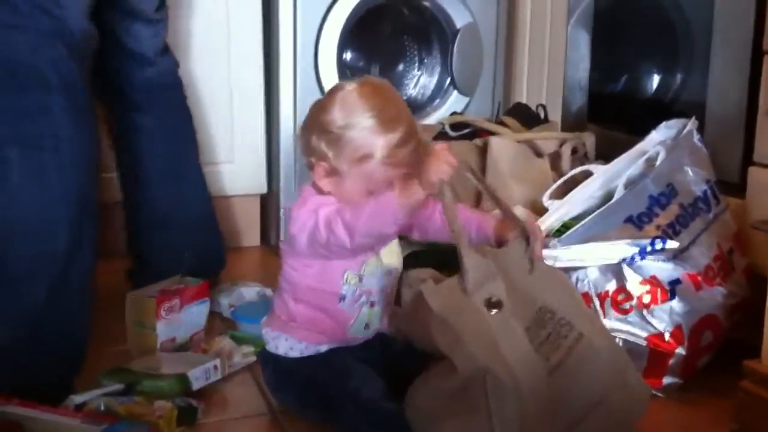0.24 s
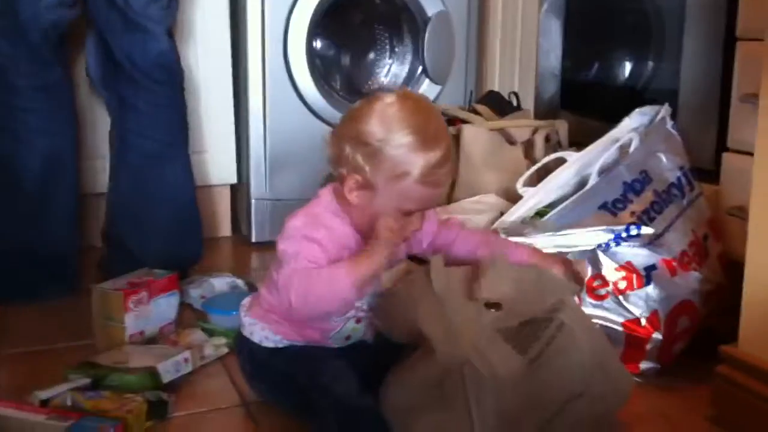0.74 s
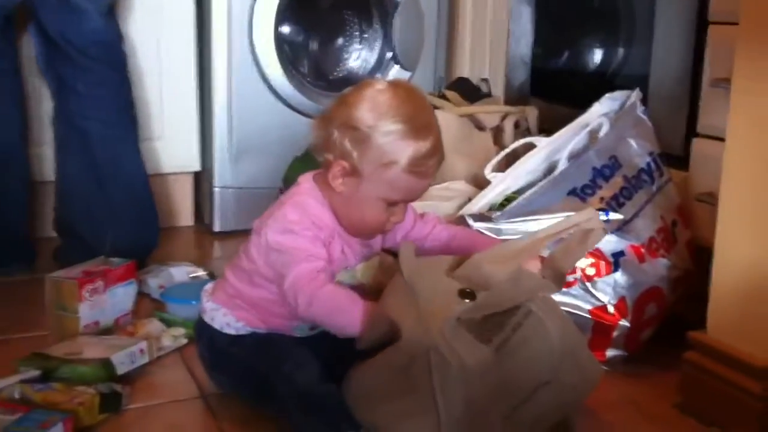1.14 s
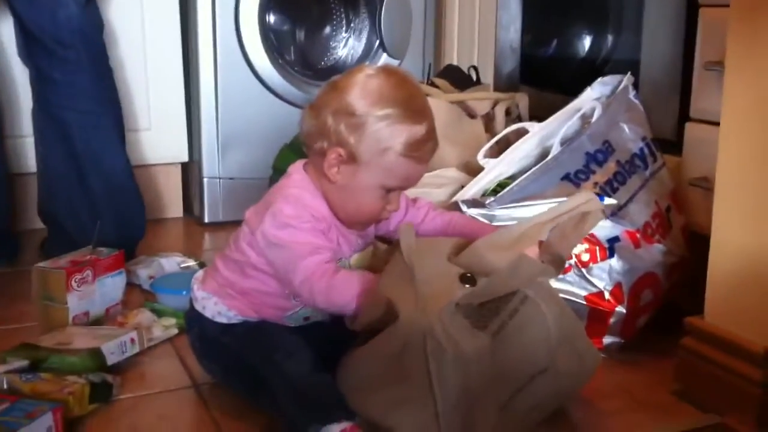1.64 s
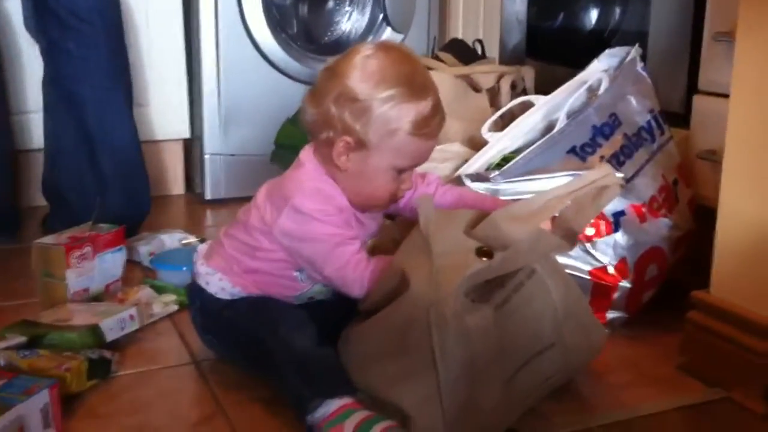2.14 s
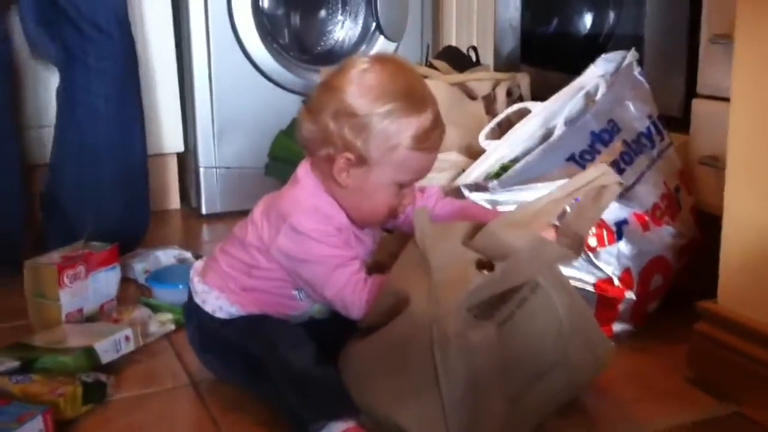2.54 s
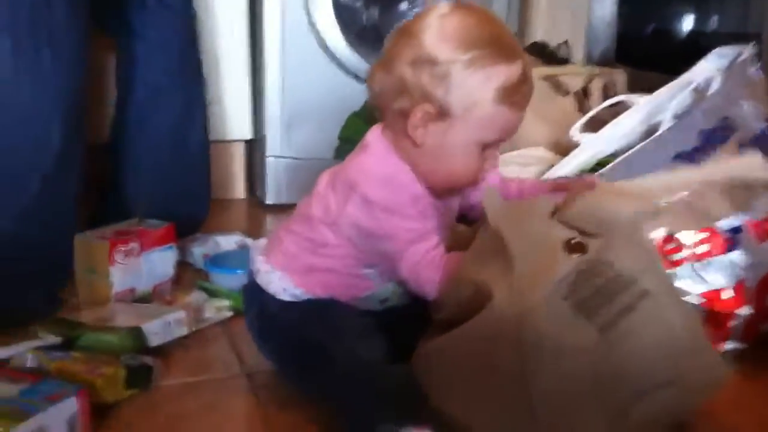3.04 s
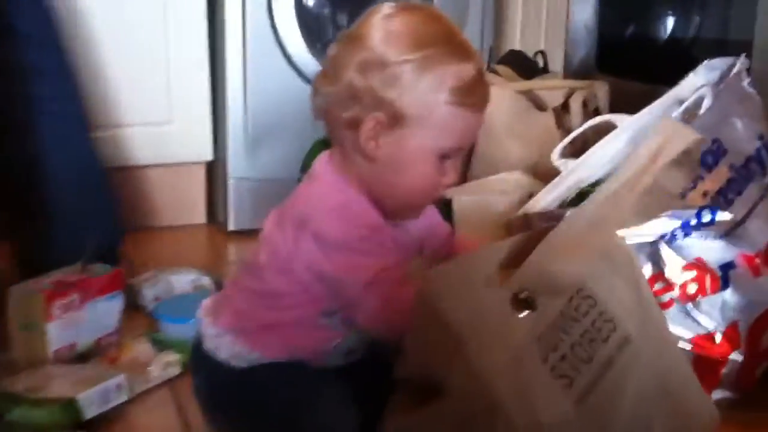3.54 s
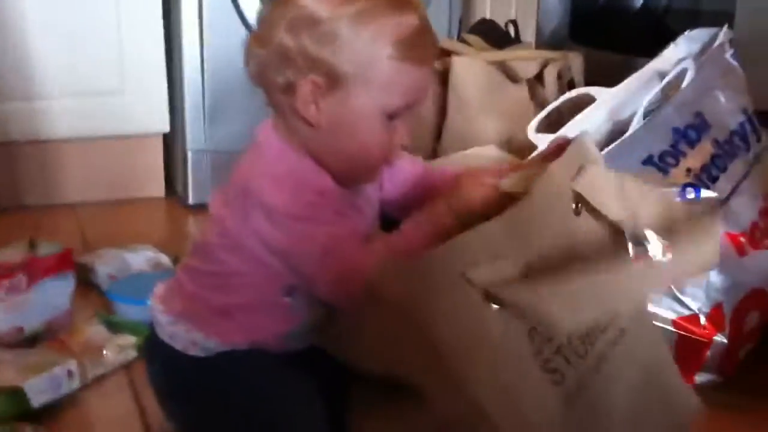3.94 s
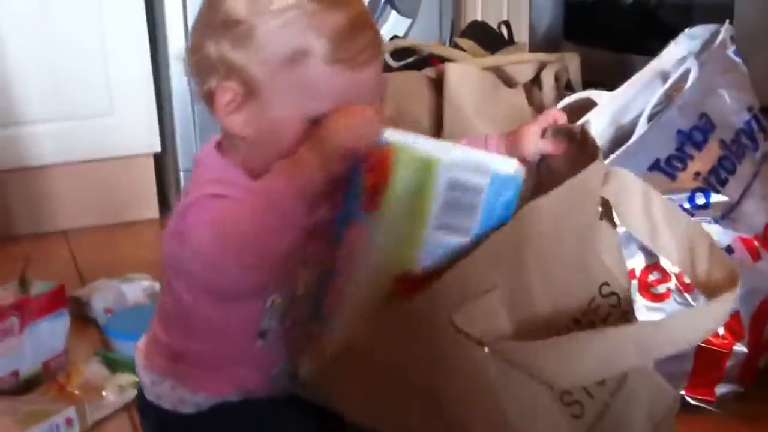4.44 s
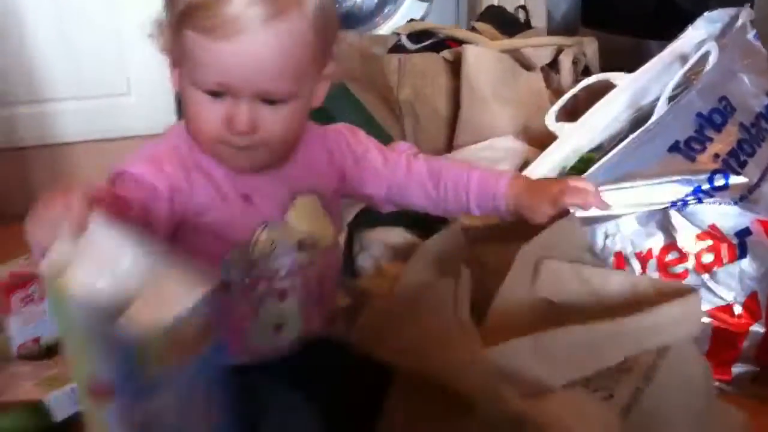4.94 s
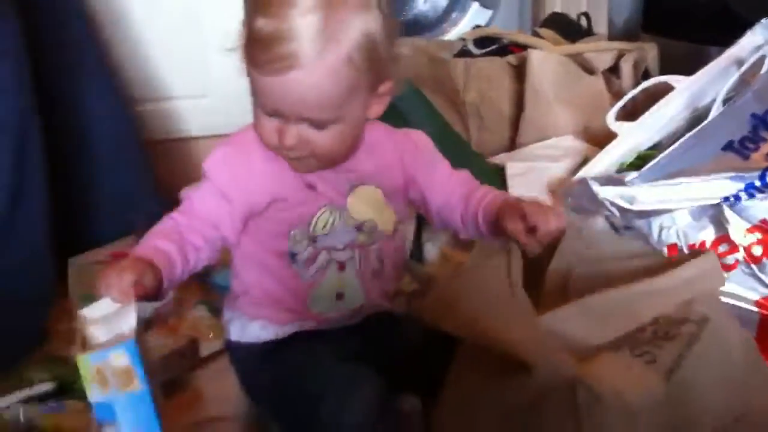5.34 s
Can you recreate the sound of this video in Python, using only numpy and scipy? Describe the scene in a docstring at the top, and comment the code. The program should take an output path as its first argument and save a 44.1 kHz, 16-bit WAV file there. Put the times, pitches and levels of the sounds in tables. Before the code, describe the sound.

Over a steady low hiss in a small tiled kitchen, heard at one microphone, a paper bag gives only faint crinkles and tiny dry ticks during the first second. At about 1.4 s something heavy, perhaps a drawer, clunks and rumbles; a second, harder clunk at 1.7 s rattles, rings and quickly settles. Soft, low bumps and light drumming of the bag follow around 2.1 s. From 3.0 s cardboard stutters along the paper in two quickening runs of small rasps, with scraping between and after them until about 3.8 s, then a crisp crease at 3.9 s. Rustling brightens around 4.3 s as the carton is pulled out; the bag's side buckles with a hollow double boom at 4.7 s, and dull bumps follow at 4.9 s. At 5.2 s the carton knocks loudly on the tiles, dry contents shifting, and paper rustles again near 5.5 s.

```python
"""A paper shopping bag on a tiled kitchen floor, rummaged in by a small child, heard at one microphone.
The paper slides and crinkles: noise and clumped snaps shaped by the strokes of the hands, with short dry ticks.
A cardboard carton stutters along the inside, is dragged out over the booming side and knocked down on the tiles:
noise bursts, plus ringing modes for the knock. Early on something heavy, perhaps a drawer, clunks twice and
rumbles. The kitchen answers briefly with decaying noise, over a steady hiss."""
import sys
import numpy as np
from scipy import signal
from scipy.fft import rfft, irfft, next_fast_len
from scipy.io import wavfile
from scipy.ndimage import uniform_filter1d, map_coordinates

SR = 44100
rng = np.random.default_rng(int(sys.argv[2]) if len(sys.argv) > 2 else 0)


def transcribe(signal):
    """Save signal, clipped to [-1, 1], as a 16-bit WAV file at the path in sys.argv[1]."""
    frames = np.atleast_2d(signal).T
    limited = np.clip(frames, -1, 1)
    pcm = np.round(limited * 32767).astype(np.int16)
    wavfile.write(sys.argv[1], SR, pcm)


N = 246386  # length in samples

# "Before trim" marks a level that its function shifts by a fixed number of dB.
# The side of the bag buckles. Each row: start [s], level before trim [dB],
# crackle against boom before trim [dB], decay time T60 of the boom [s].
BUCKLES = [(4.724, -28.5, -19, 0.15), (4.764, -30, -32, 0.085)]
# Soft bumps inside the bag. Each row: start [s], level before trim [dB], pitch [Hz].
BUMPS = [(0.395, -61, 264), (0.493, -59, 300), (1.42, -38, 353), (1.54, -41, 317), (2.102, -40, 386),
         (2.134, -46, 397), (2.17, -52, 384), (4.184, -48.5, 250), (4.257, -53, 259), (4.858, -39.5, 338),
         (4.912, -41, 420)]
# The carton sticks and slips on the paper. Each row: start [s], number of slips, first wait [s],
# level before trim [dB], pitch of the rasp [Hz], boom against the first rasp [dB].
SLIP_RUNS = [(2.999, 6, 0.047, -43.5, 800, -9), (3.255, 9, 0.035, -45, 1160, -1),
             (4.182, 1, 0, -42.5, 1040, -1), (4.315, 1, 0, -44, 1770, -27), (4.377, 1, 0, -47.5, 1260, -12)]
# Short dry ticks: the loudest creases, and at 5.186 s a bright tick just before the landing.
# Each row: start [s], level [dB], pitch [Hz].
LOUD_TICKS = [(0.091, -63.5, 7300), (0.2996, -60.5, 6000), (0.3391, -64, 2620), (1.246, -60, 8600),
              (1.6016, -57.5, 5540), (2.8061, -56.5, 2700), (2.9296, -61, 3300), (3.8828, -47, 2800),
              (3.985, -56, 6700), (4.0724, -63, 3540), (4.13, -59.5, 2560), (4.2203, -56, 5300),
              (4.3, -55, 11000), (4.4497, -61, 5400), (4.531, -53.5, 9800), (4.7261, -51, 3300),
              (5.186, -43, 7040), (5.2474, -48.5, 3600), (5.375, -59.5, 5370), (5.4596, -59, 3530),
              (5.501, -52.5, 4270)]
# The carton lands. Each row: start [s], level before trim [dB], dull above [Hz].
LANDING_CONTACTS = [(5.194, -22.5, 14000), (5.2012, -29.5, 4050), (5.216, -33, 900)]
# Heavy clunks. Each row: start [s], level [dB], ring against the clunk before trim [dB],
# rattle against the push [dB], centre of the push resonance [Hz], its sharpness Q [-],
# rise of the push [s], decay time T60 of the push [s].
CLUNKS = [(1.367, -26, -4, -20, 332, 0.38, 0.011, 0.039),
          (1.677, -22.5, -9.5, -25, 422, 0.66, 0.0022, 0.0426),
          (1.692, -28.5, -7, -24.5, 827, 3.5, 0.0049, 0.11),
          (1.726, -30, -11, -19.5, 403, 0.9, 0.0054, 0.03)]
# The heavy thing rumbles on after each clunk. Each row: start [s], end [s], level [dB], fade [dB per s].
ROLLS = [(1.367, 1.682, -38.5, 26.5), (1.675, 2.1, -34, 99)]
# Strokes of friction, mostly sliding paper. Each row: peak [s], rise [s], fall [s], then, before trim,
# hollow drumming [dB], scraping [dB], crinkling [dB], and last brightness [dB per octave].
STROKES = [(0.095, 0.05, .08, -83, -71.5, -63.5, 3), (0.32, 0.081, 0.051, -81, -66.5, -64, 0.5),
           (0.66, 0.37, 0.17, -77, -84, -66.5, 0.5), (0.84, 0.18, 0.091, -86, -62.5, -57.5, 0.5),
           (1.391, 0.019, 0.077, -74, -67, -52.5, -1.5), (1.70, 0.072, 0.048, -67, -47.5, -49, 0.5),
           (1.96, 0.14, 0.12, -62, -60, -63, -0.5), (2.12, 0.069, .05, -58, -61, -69, -2),
           (2.41, 0.079, 0.075, -64.5, -61, -62, -3), (2.76, 0.53, 0.095, -93, -73.5, -64, 1),
           (2.86, 0.052, 0.1, -58, -58, -68.5, -6), (3.004, 0.04, 0.065, -56, -53, -58.5, -3.5),
           (3.1, 0.069, 0.079, -53, -45, -54.5, -1), (3.415, 0.047, 0.083, -76, -54, -57, -3.5),
           (3.4, 0.58, 0.37, -68.5, -61, -58.5, -1), (3.64, 0.088, 0.12, -57, -54.5, -56.5, 0.5),
           (3.745, 0.1, .15, -65, -52.5, -49.5, -0.5), (3.96, 0.13, 0.1, -64.5, -63, -57.5, 2.5),
           (4.259, .12, 0.098, -61.5, -55, -49, 2), (4.47, .025, .08, -63, -58.5, -61, 0),
           (4.545, 0.048, 0.091, -53.5, -61, -60.5, 2), (4.67, 0.076, .1, -57, -62, -65, 0),
           (4.77, .05, 0.087, -44.5, -55, -57.5, -4), (4.929, 0.13, 0.083, -48.5, -57, -54.5, 2.5),
           (5.02, 0.058, 0.1, -54, -65.5, -60, 4), (5.22, 0.023, 0.055, -67, -64, -45.5, -3),
           (5.29, 0.042, 0.088, -55.5, -59, -67, -2), (5.519, 0.067, 0.094, -58.5, -49.5, -50, -3.5)]

# Modes of the carton. Each row: frequency [Hz], relative level [dB], decay time T60 [s].
CARTON_MODES = [(155.4, -8, 0.13), (311, 1.5, 0.1), (351, 4.5, 0.075), (605, -18, 0.05), (810, -1, 0.094),
                (1560, -3, 0.081), (2143, -7, 0.11), (2896, -10.5, 0.21)]
# Modes of the heavy clunking thing. Each row: frequency [Hz], relative level [dB], decay time T60 [s].
HEAVY_MODES = [(141, -14.5, 0.24), (302, 1, 0.18), (386, 3, 0.32), (451, -1, 0.36), (524, -3, 0.18),
               (609, -2, 0.46), (694, 0, 0.18), (748, 7.5, 0.13), (895, -22, .2), (1120, -3.5, .17),
               (1694, -4, 0.38), (1747, -14, 0.33), (2655, -16.5, 0.33), (3010, -21, 0.51),
               (3327, -18, 0.38), (4280, -31, 0.27), (4650, -13.5, .42), (4750, -23.5, 0.35)]

# Boom of the bag's side. Each row: frequency [Hz], relative level [dB per Hz].
PANEL_SPECTRUM = [(30, -40), (75, -33), (105, -7), (160, -6), (350, 0.5), (550, -5.5), (800, -9),
                  (1150, -14), (1700, -16.5), (2500, -23.5), (8000, -35)]
# Carton against tiles. Each row: frequency [Hz], relative level [dB per Hz].
KNOCK_SPECTRUM = [(30, -25), (75, -20.5), (150, 3.5), (235, -10.5), (330, 3.5), (470, -4.5), (720, 4),
                  (1100, -9.5), (2200, -12), (4500, -16), (6000, -14), (9500, -21.5), (15800, -25)]
# Hollow drumming of the bag's sides. Each row: frequency [Hz], relative level [dB per Hz].
DRUM_SPECTRUM = [(25, -37), (70, -19), (115, 0), (190, 0.5), (330, 2), (450, 0.5), (620, -3), (1100, -7.5),
                 (3000, -70.5)]
# Scraping on the paper's surface. Each row: frequency [Hz], relative level [dB per Hz].
SCRAPE_SPECTRUM = [(200, -44), (520, -1.5), (800, 1.5), (1150, 2.5), (1600, -1.5), (2700, -10.5),
                   (4000, -17), (9000, -45)]
# Crinkling of the folds. Each row: frequency [Hz], relative level [dB per Hz].
CRINKLE_SPECTRUM = [(1000, -48), (2000, -3), (2800, 2.5), (4500, 0), (7000, -1), (10000, -4), (13000, -5.5),
                    (15800, -9.5)]
# Crackle of a buckling side, also the rattle of a clunk. Each row: frequency [Hz], relative level [dB per Hz].
CRACKLE_SPECTRUM = [(800, 5), (2800, -2), (6500, -1.5), (10000, -9), (15800, -31)]
# Room and microphone background. Each row: frequency [Hz], relative level [dB per Hz].
HISS_SPECTRUM = [(25, 0), (70, -10), (140, 4), (300, 2.5), (900, -0.5), (2000, -3.5), (5000, -5),
                 (10000, -7.5), (15800, -6.5)]
# Push of the heavy thing. Each row: frequency [Hz], relative level [dB per Hz].
THUD_SPECTRUM = [(30, -53), (80, -29), (130, 9.5), (205, -8), (330, 6), (480, -2.5), (780, -3.5),
                 (1150, -6), (1350, -12.5), (1750, -10), (2300, -17.5), (4000, -29), (15000, -43)]
# Dry contents of the carton. Each row: frequency [Hz], relative level [dB per Hz].
CONTENTS_SPECTRUM = [(400, -12), (1000, -5), (2300, 0), (3300, 3), (4300, -21), (8000, -22), (15800, -27)]
# Rumble of the heavy thing. Each row: frequency [Hz], relative level [dB per Hz].
RUMBLE_SPECTRUM = [(25, -58), (75, -41), (142, -2.5), (205, -8), (310, -2.5), (450, 2), (580, -12.5),
                   (1100, -21.5), (3000, -49)]
# Decay of the kitchen. Each row: frequency [Hz], decay time T60 [s].
KITCHEN_DECAY = [(100, 0.55), (300, 0.39), (800, 0.38), (2000, 0.5), (5000, 0.41), (13000, 0.43)]

LOW_CUT_HZ, TOP_HZ = 54, 15900  # band of the microphone
AGE = np.arange(SR * 3 // 4) / SR  # seconds since the start of a short sound
STROKE_DROP_DB, STROKE_ROUNDNESS = 11, 1.09  # drop over one rise or fall time; 1 = pointed, 2 = bell-shaped
RESTING_DB = -80  # the held bag is never quite still
DRUM_HZ, DRUM_AT_DB, DRUM_OCTAVES_PER_DB = 332, -58.5, 0.07  # a harder drag drums higher
SHORTEST_WAIT_S, WAIT_SHRINK = 0.017, 0.5  # the wait above the shortest one halves at each slip
STUTTER_GROWTH_DB = 5  # the rasp grows from the first slip of a run to the last
TICK_T60_S = 0.024
SMALL_CREASES_PER_S, SMALL_CREASE_DB = 5, -2  # stray ticks, relative to the tabled crinkling around them
SMALL_CREASE_HZ, SMALL_CREASE_OCTAVES = 4200, 0.64  # their middle pitch and scatter to either side
ROLL_RISE_S = 0.021


def amp(db):
    """Decibels to gain."""
    return 10 ** (np.asarray(db) / 20)


def unit(x):
    """Scale to rms 1."""
    return x / np.sqrt(np.mean(x ** 2) + 1e-20)


def impulse(x):
    """Scale to the energy of 10 ms at rms 1."""
    return x * np.sqrt(SR / 100 / (np.sum(x ** 2) + 1e-20))


def along(points, hz):
    """Interpolate (Hz, value) points on a log frequency axis."""
    f, v = np.transpose(points)
    return np.interp(np.log(hz + 1), np.log(f), v)


def spectrum_gain(points):
    """Gain over frequency that follows a table of (Hz, dB)."""
    return lambda hz: amp(along(points, hz))


def resonance(centre, q):
    """Gain of one broad resonance."""
    return lambda hz: 1 / np.hypot(1, q * (hz / centre - centre / (hz + 1)))


def curves(rows, times):
    """The value of each column at the given times."""
    s, *columns = np.transpose(rows)
    return [np.interp(times, s, column) for column in columns]


def wobble(rate):
    """A smooth random curve, rate knots a second."""
    knots = rng.standard_normal(int(N * rate / SR) + 4)
    return map_coordinates(knots, [np.arange(N) * rate / SR])


def colour(x, gain, even=False):
    """Causal filter with a gain that depends on frequency; even first levels the broad humps of x."""
    m = 2 * next_fast_len(len(x) // 2 + 4096, real=True)
    z = rfft(x, m)
    g = gain(np.fft.rfftfreq(m, 1 / SR))
    if even:
        power = uniform_filter1d(np.abs(z) ** 2, m * 200 // SR)  # averaged over 200 Hz
        g = g / np.sqrt(np.abs(power) + 1e-12)
    # Folding the cepstrum onto positive time gives minimum phase: nothing sounds before its cause.
    cepstrum = irfft(np.log(np.maximum(g, g.max() * 1e-6)))
    cepstrum[1:m // 2] *= 2
    cepstrum[m // 2 + 1:] = 0
    return irfft(z * np.exp(rfft(cepstrum)))[:len(x)]


def dull(x, corner):
    """A softer contact loses its treble."""
    return colour(x, lambda hz: 1 / np.hypot(1, hz / corner))


def onset(rise):
    """Smooth start of a short sound."""
    return 1 - np.exp(-(AGE / rise) ** 2)


def burst(rise, t60, gain):
    """A short coloured puff of noise that rises and dies away."""
    shape = onset(rise) * amp(-60 * AGE / t60)
    return impulse(colour(rng.standard_normal(len(AGE)) * shape, gain, even=True))


def ring(modes, rise, rough):
    """Damped modes; loose parts chatter against them and make each one flutter."""
    tones = np.zeros(len(AGE))
    for hz, db, t60 in modes:
        knots = rng.standard_normal((2, 110))
        real, imag = signal.resample(knots, len(AGE), axis=1)
        flutter = 1 + rough * (real + 1j * imag)
        carrier = np.exp(2j * np.pi * (hz * AGE + rng.random()))
        tones += amp(db - 60 * AGE / t60) * np.real(flutter * carrier)
    return impulse(tones * onset(rise))


def grains(rate, spread_db):
    """Tiny snaps at random moments, rate a second, most of them weak."""
    size = amp(spread_db * np.minimum(rng.exponential(size=N), 3))
    struck = rng.random(N) < rate / SR
    return unit(struck * size * rng.choice([-1, 1], N))


def add(track, s, sound):
    """Mix a sound in at s seconds."""
    room = track[round(s * SR):][:len(sound)]
    room += sound[:len(room)]


def hiss():
    """Steady background of the room and the microphone: coloured noise."""
    return amp(-67.5) * unit(colour(rng.standard_normal(N), spectrum_gain(HISS_SPECTRUM)))


def kitchen(x, wet_db):
    """The direct sound and the diffuse answer of tiles and cupboards, noise that decays band by band."""
    hz, t, z = signal.stft(rng.standard_normal(len(AGE)), SR, nperseg=256)
    decay = amp(-60 * t / along(KITCHEN_DECAY, hz)[:, None])
    tail = signal.istft(z * decay, SR, nperseg=256)[1][:len(AGE)]
    tail *= onset(0.0041)
    return x + amp(wet_db) * signal.fftconvolve(x, tail / np.linalg.norm(tail))[:len(x)]


def roll():
    """Small jolts on the way keep the heavy thing's low resonances going, ever more weakly."""
    level = np.zeros(N)
    for start, end, db, fade_db_per_s in ROLLS:
        age = np.arange(round((end - start) * SR)) / SR
        add(level, start, amp(db - fade_db_per_s * age) * (1 - np.exp(-(age / ROLL_RISE_S) ** 2)))
    jolts = colour(grains(rate=2500, spread_db=0.0), spectrum_gain(RUMBLE_SPECTRUM))
    return kitchen(level * unit(jolts), wet_db=-8.5)


def clunks():
    """A heavy push, the hard ring it wakes and a faint rattle."""
    out = np.zeros(N)
    for s, db, ring_db, rattle_db, pitch_hz, q, rise, t60 in CLUNKS:
        push = burst(rise, t60, lambda hz: amp(along(THUD_SPECTRUM, hz)) * resonance(pitch_hz, q)(hz))
        rattle = burst(0.0086, 0.19, spectrum_gain(CRACKLE_SPECTRUM))
        add(out, s, amp(db) * kitchen(push + amp(rattle_db) * rattle, wet_db=-2.5))
        hard_ring = ring(HEAVY_MODES, rise=0.0086, rough=0.91)
        add(out, s, amp(db + ring_db + 1.0) * kitchen(hard_ring, wet_db=-8.0))
    return out


def bumps():
    """Groceries nudge the bag and stir one low resonance."""
    out = np.zeros(N)
    for s, db, pitch_hz in BUMPS:
        hum = burst(0.004, 0.11, lambda hz: resonance(pitch_hz, q=3.2)(hz) ** 2)
        add(out, s, amp(db - 5.0) * kitchen(hum, wet_db=-5.5))
    return out


def landing():
    """The carton hits the tiles edge first and settles; its dry contents shift a moment later."""
    out = np.zeros(N)
    for s, db, corner_hz in LANDING_CONTACTS:
        knock = burst(0.00066, 0.025, spectrum_gain(KNOCK_SPECTRUM))
        body = ring(CARTON_MODES, rise=0.0031, rough=0.2)
        contact = dull(knock + amp(-7.0) * body, corner_hz)
        add(out, s, amp(db - 2.5) * kitchen(contact, wet_db=-8.5))
    contents = burst(0.042, 0.16, spectrum_gain(CONTENTS_SPECTRUM))
    clumps = amp(3 * wobble(160)[:len(AGE)])  # the pieces tumble in uneven handfuls
    add(out, 5.235, amp(-43.5) * kitchen(impulse(contents * clumps), wet_db=-6.0))
    return out


def slips():
    """Each slip is a cardboard rasp with a little boom from the bag; in a run they come faster and rasp harder."""
    out = np.zeros(N)
    for s, count, wait, db, pitch_hz, boom_db in SLIP_RUNS:
        for growth_db in np.linspace(0, STUTTER_GROWTH_DB, round(count)):
            rasp = burst(0.00091, 0.028, lambda hz: resonance(pitch_hz, q=2.6)(hz) ** 1.32)
            boom = burst(0.002, 0.045, lambda hz: resonance(330, q=1.5)(hz) ** 2)
            slip = amp(growth_db) * rasp + amp(boom_db) * boom
            add(out, s, amp(db - 10.5) * kitchen(slip, wet_db=-5.5))
            s = s + wait
            wait = SHORTEST_WAIT_S + WAIT_SHRINK * (wait - SHORTEST_WAIT_S)
    return out


def buckles():
    """A side of the bag gives way: a hollow boom and a spray of crackle."""
    out = np.zeros(N)
    for s, db, crackle_db, t60 in BUCKLES:
        boom = burst(0.0025, t60, spectrum_gain(PANEL_SPECTRUM))
        crackle = burst(0.0026, 0.08, spectrum_gain(CRACKLE_SPECTRUM))
        add(out, s, amp(db - 7) * kitchen(boom + amp(crackle_db + 2.5) * crackle, wet_db=0))
    return out


def handling():
    """All strokes swell, fade and add up: rows of (s, drumming dB, scraping dB, crinkling dB, brightness)."""
    t = np.arange(0, N, SR // 500) / SR  # about 500 points a second
    peak, rise, fall, drum_db, scrape_db, crinkle_db, bright = np.transpose(STROKES)[:, :, None]
    away = np.maximum((peak - t) / rise, (t - peak) / fall)
    swell_db = -STROKE_DROP_DB * away ** STROKE_ROUNDNESS
    power = amp(np.array([drum_db, scrape_db, crinkle_db]) + swell_db) ** 2
    total = power.sum(axis=1) + amp(RESTING_DB) ** 2
    brightness = (power[-1] * bright).sum(axis=0) / total[-1]  # weighted by crinkling power
    return np.column_stack([t, *10 * np.log10(total), brightness])


def small_creases():
    """Stray folds give way at random, louder when the paper is busy: rows like LOUD_TICKS."""
    draws = rng.random((round(SMALL_CREASES_PER_S * N / SR), 2))
    times = draws[:, 0] * N / SR
    _, _, crinkle_db, _ = curves(handling(), times)
    pitches = SMALL_CREASE_HZ * 2 ** (SMALL_CREASE_OCTAVES * (2 * draws[:, 1] - 1))
    return list(zip(times, crinkle_db + SMALL_CREASE_DB, pitches))


def ticks():
    """Short dry ticks, mostly folds that snap through, with little sound below each tick's own pitch."""
    out = np.zeros(N)
    for s, db, pitch_hz in list(LOUD_TICKS) + small_creases():
        def tick_gain(hz):
            low_cut = 1 / np.hypot(1, (0.6 * pitch_hz / (hz + 1)) ** 3)
            return resonance(pitch_hz, q=1.8)(hz) * low_cut

        tick = burst(0.00062, TICK_T60_S, tick_gain)
        add(out, s, amp(db) * kitchen(tick, wet_db=-4.5))
    return out


def flex(x, gain, patchy_db):
    """Paper changes shape as it moves: a gain of frequency and time, with wandering resonances on top."""
    hz, t, z = signal.stft(x, SR, nperseg=512)
    field = uniform_filter1d(rng.standard_normal(z.shape), size=5, axis=0)  # smooth over frequency
    field = uniform_filter1d(field, size=20, axis=1)  # and over time
    g = gain(hz[:, None], t) * amp(patchy_db * unit(field))
    return unit(signal.istft(z * g, SR, nperseg=512)[1][:N])


def rustle():
    """Sliding paper: smooth friction and clumps of snaps drive the sides, the surface and the creases."""
    motion = handling()
    drum, scrape, crinkle, _ = amp(curves(motion, np.arange(N) / SR))
    snaps = unit(grains(rate=1500, spread_db=3.0) * amp(2.5 * wobble(70)))

    def excite(spectrum, friction):
        drive = snaps + friction * rng.standard_normal(N)
        return colour(drive, spectrum_gain(spectrum))

    def drum_gain(hz, t):
        harder_db = curves(motion, t)[0] - DRUM_AT_DB
        pitch_hz = DRUM_HZ * 2 ** (DRUM_OCTAVES_PER_DB * harder_db)
        return resonance(pitch_hz, q=1.1)(hz)

    def fold_tilt(hz, t):
        brightness = curves(motion, t)[-1]
        return amp(brightness * np.log2((hz + 500) / 7000))

    sides = flex(excite(DRUM_SPECTRUM, friction=1.0), drum_gain, patchy_db=2)
    surface = flex(excite(SCRAPE_SPECTRUM, friction=0.91), lambda hz, t: 1, patchy_db=4.5)
    folds = flex(excite(CRINKLE_SPECTRUM, friction=1.0), fold_tilt, patchy_db=1.6)
    paper = drum * sides + scrape * surface + crinkle * folds
    return kitchen(amp(-1.0) * paper, wet_db=-9.0)


def scene():
    """All sounds at one microphone."""
    paper = rustle()
    heavy_thing = clunks() + roll()
    bag_and_carton = buckles() + bumps() + slips() + landing()
    return (paper + heavy_thing + bag_and_carton + hiss() + ticks())[None]


def record(dry):
    """The microphone sheds deep bass, and nothing is kept above its band limit."""
    low_cut = signal.butter(2, LOW_CUT_HZ, "highpass", fs=SR, output="sos")
    lean = signal.sosfilt(low_cut, dry)
    m = next_fast_len(N + SR // 2)
    kept = np.fft.rfftfreq(m, 1 / SR) < TOP_HZ
    return irfft(rfft(lean, m) * kept, m)[..., :N]


dry = scene()
out = record(dry)
transcribe(out)
```